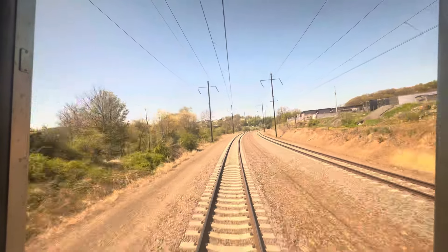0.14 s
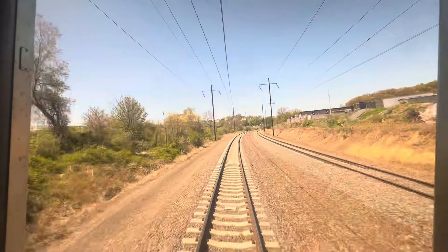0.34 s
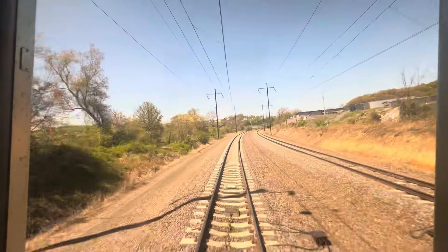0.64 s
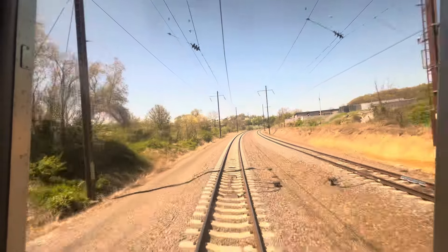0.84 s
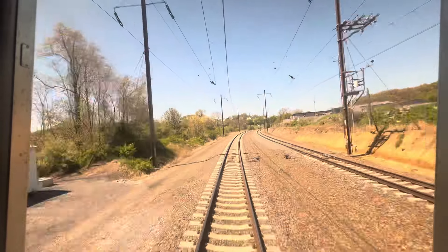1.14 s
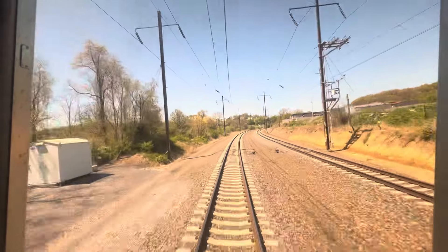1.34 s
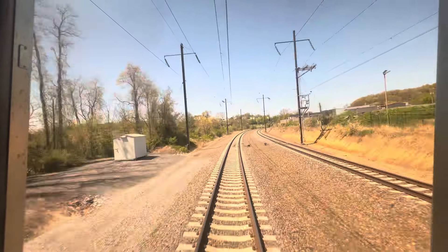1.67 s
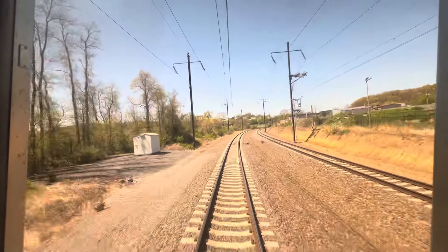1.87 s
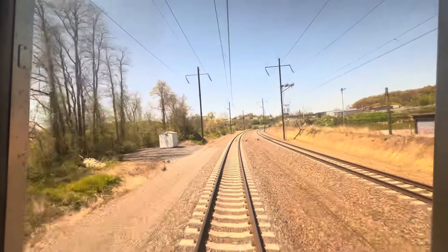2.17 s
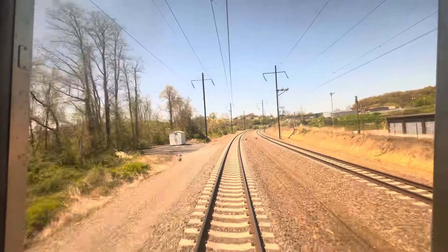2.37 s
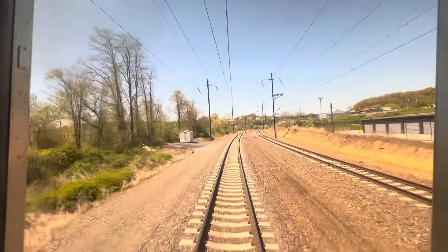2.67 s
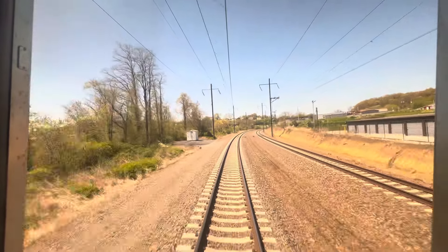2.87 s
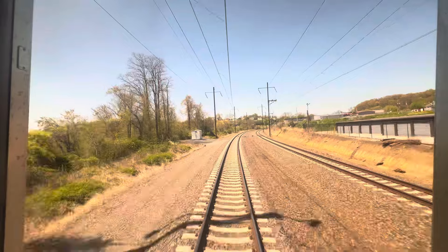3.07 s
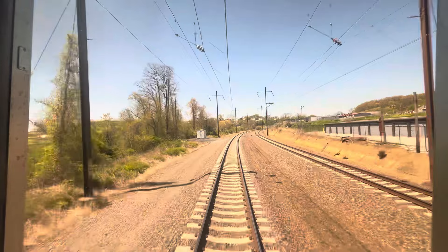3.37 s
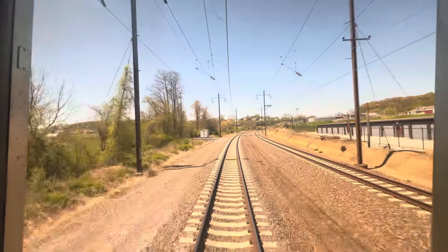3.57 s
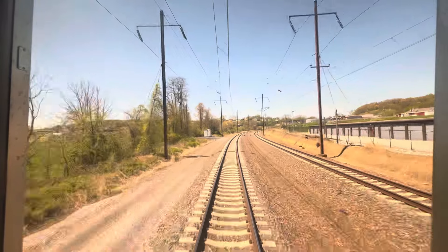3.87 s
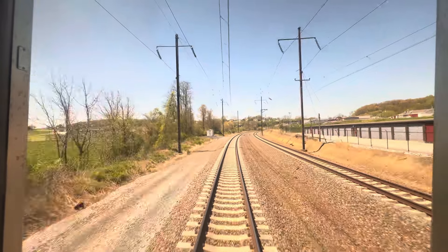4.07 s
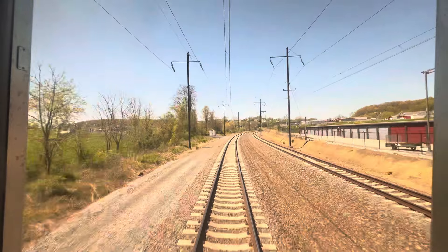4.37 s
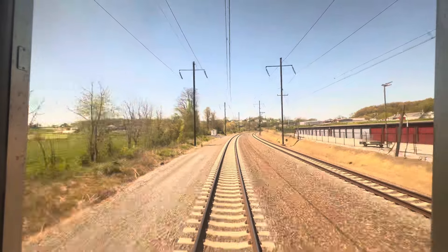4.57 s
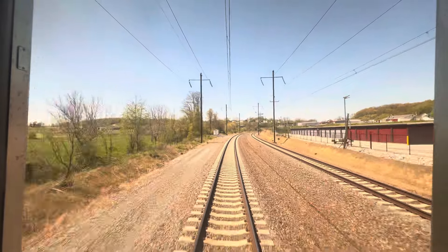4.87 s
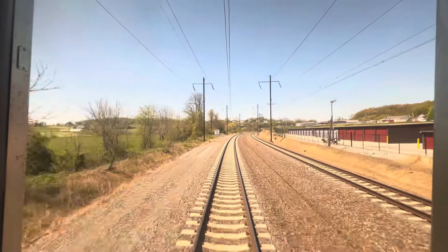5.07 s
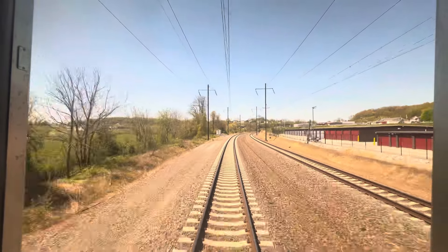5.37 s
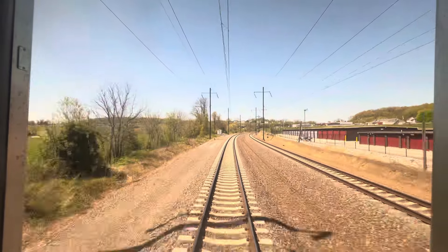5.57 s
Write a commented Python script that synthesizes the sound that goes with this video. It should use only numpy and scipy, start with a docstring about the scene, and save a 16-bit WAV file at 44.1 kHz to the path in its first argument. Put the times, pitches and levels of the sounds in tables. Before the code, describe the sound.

Heard from inside a moving train car, wheels rumble continuously on the rails, with a low motor hum and a light draught at the door. Close by and slightly left, metal fittings rattle at the start, followed by a quick cluster of hollow door knocks. The rattling then thins to occasional dry ticks, the wheels ring a little more from about halfway, and soft floor bumps come near the end.

```python
"""Wheels roll on the rails, heard inside the end vestibule of a passenger car at speed. Their roughness
makes the floor rumble, rails and wheels ring, and the car's air and panels boom at fixed pitches.
Draughts hiss at the door. An out-of-round wheel and a motor under the floor hum, and the motor buzzes
loose fittings once a turn. Nearby, mostly louder on the left, door hardware rattles, the door knocks,
the floor jolts and plastic trim ticks; one faint, high swish passes."""
import sys
import numpy as np
from scipy import signal
from scipy.fft import rfft, irfft, next_fast_len
from scipy.io import wavfile
from scipy.ndimage import uniform_filter1d, map_coordinates

SR = 44100
rng = np.random.default_rng(int(sys.argv[2]) if len(sys.argv) > 2 else 0)


def dump(signal):
    """Clip the signal to [-1, 1] and save it as 16-bit WAV at the path in sys.argv[1]."""
    limited = np.clip(np.atleast_2d(signal).T, -1, 1)
    pcm = np.round(limited * 32767).astype(np.int16)
    wavfile.write(sys.argv[1], SR, pcm)


N = 252252


def amp(db):
    """dB to gain."""
    return 10 ** (np.asarray(db) / 20)

def unit(x):
    """x at rms 1."""
    return x / np.sqrt(np.mean(x ** 2) + 1e-20)

def along(points, hz):
    """Reads (Hz, value) points on a log axis."""
    f, v = np.transpose(points)
    return np.interp(np.log(hz + 1), np.log(f + 1), v)

def curves(rows):
    """One automation curve for each column after the time."""
    s, *cols = np.transpose(rows)
    return [np.interp(np.arange(N) / SR, s, c) for c in cols]

def wobble(rate):
    """A smooth random curve, rate knots a second."""
    return map_coordinates(rng.standard_normal(int(N * rate / SR) + 4), [np.arange(N) * rate / SR])

def filtered(x, response):
    """x through a complex frequency response."""
    m = next_fast_len(x.shape[-1] + SR // 2)
    return irfft(rfft(x, m) * response(np.fft.rfftfreq(m, 1 / SR)), m)[..., :x.shape[-1]]

def modes(table, f):
    """Gain of (Hz, width, dB) resonances whose powers add."""
    return np.sqrt(sum(amp(2 * db) / (1 + ((f * f - c * c) / (f * w + 1)) ** 2) for c, w, db in table))

def band(f, hz, width):
    """Band-pass gain."""
    return modes([(hz, width, 0)], f) ** 2

def lowpass(f, hz, order):
    """High-cut gain."""
    return 1 / (1 + (f / hz) ** order)

def sides(db):
    """Left and right gains for a pan in dB; positive is left."""
    return amp(np.array([db / 2, -db / 2]))

def add(track, s, sound):
    """Mixes a short sound into the track at time s."""
    start = round(s * SR)
    track[:, start:start + sound.shape[1]] += sound

# Stereo image of the noise beds. Each row: frequency in Hz, then in turn
LIKENESS = [(30, .88), (90, .8), (215, .74), (344, .8), (460, .3), (560, .62), (730, .55), (950, .1),
            (1230, .65), (1420, .32), (1750, .12), (1900, .45), (2200, .15), (2450, .6), (2800, .64),
            (3400, .1), (4000, .25), (5500, .12), (8700, .35)]  # left-right likeness from 0 to 1,
LEFT_LEAD = [(0, 0), (340, -.4), (480, 2.8), (620, 3), (750, 2.2), (900, 2.3), (1120, 4.5), (1250, 4.2),
             (1640, 4.8), (1900, 5.4), (2400, 9.6), (3100, 8.8), (3700, 6.6), (4800, 7.2)]  # phase lead of the left in radians,
BED_PAN = [(40, 4.5), (90, 2), (140, 13), (210, -2), (400, -3), (800, 0), (1300, 5), (2500, 11.5),
           (4000, 8.5), (5500, 12.5), (7000, 10), (9000, -1)]  # pan in dB.
def noise_bed(colour, patchy_db):
    """Stereo noise, patchy in time and pitch, its mono mix at rms 1."""
    spectra = signal.stft(rng.standard_normal((2, N)), nperseg=512)[2]
    patches = uniform_filter1d(uniform_filter1d(rng.standard_normal(spectra.shape[1:]), 5, 0), 10, 1)
    pair = signal.istft(spectra * amp(patchy_db * unit(patches)), nperseg=512)[1][:, :N]
    spread = lambda f: np.arccos(np.clip(along(LIKENESS, f), 0, 1)) / 2
    mid, side = filtered(pair, lambda f: colour(f) * [np.cos(spread(f)), np.sin(spread(f))])
    shift = lambda f: np.exp(.5j * np.array([[1], [-1]]) * along(LEFT_LEAD, f))
    both = filtered(np.array([mid + side, mid - side]), lambda f: sides(along(BED_PAN, f)) * shift(f))
    return both / np.std(both.mean(axis=0))

# Rumble EQ. Each row: frequency in Hz, level in dB.
RUMBLE_EQ = [(12, -43), (20, -11.5), (70, 0), (96, 0.5), (156, -12), (190, -17.5), (250, -27.5),
             (420, -120)]
def floor_rumble(level_db):
    """Wheel and rail roughness shakes the floor."""
    gain = amp(level_db - 2 + .88 * wobble(14))
    return gain * noise_bed(lambda f: amp(along(RUMBLE_EQ, f)), patchy_db=1.04)

# Rail resonances. Each row: pitch in Hz, width in Hz, level in dB.
RAIL_MODES = [(804, 260, 0.5), (863.5, 16, 7.5), (892, 11, 10.5), (926.6, 8.3, 10), (1029, 42, 3),
              (1150, 14, -4.5), (1259, 25, 1.5), (1301, 23, 4.5), (1366, 22, 1), (1390, 16, 5.5),
              (1506, 73, -6), (1640, 120, -9.5), (2000, 1600, -13.5), (2718, 130, -7)]
def rail_roar(level_db):
    """The rails resonate under the rolling wheels."""
    colour = lambda f: modes(RAIL_MODES, f) * band(f, 1400, 2200) * lowpass(f, 3300, 8)
    return amp(level_db) * noise_bed(colour, patchy_db=1.5)

# Wheel web and rim resonances. Each row: pitch in Hz, width in Hz, level in dB.
WEB_MODES = [(1478, 34, 8), (1575, 30, 3), (1684, 30, 3), (1860, 40, -1), (1950, 40, -1), (2009, 14, 3.5),
             (2070, 20, 2.5), (2145, 24, -1), (1900, 500, -10)]
RIM_MODES = [(2276, 78, 0.5), (2370, 360, -15.5), (2380, 14, 0), (2520, 16, -4)]
# Ring faders. Each row: time in seconds, web gain in dB, rim gain in dB.
RING_FADERS = [(0, -10, -19), (.75, -18, -22), (2.2, -31, -12.5), (2.5, -11.5, -3.5), (2.9, -4.5, -3),
               (3.4, -3, -2), (3.9, -2, -4), (5.72, -4, -1.5)]
def wheel_ring(level_db):
    """Rolling sets the web and rim of the wheels ringing."""
    web_db, rim_db = level_db + curves(RING_FADERS)
    web = noise_bed(lambda f: modes(WEB_MODES, f) * band(f, 1850, 1400), patchy_db=0)
    rim = noise_bed(lambda f: modes(RIM_MODES, f) * band(f, 2350, 700), patchy_db=.5)
    return amp(web_db) * web + amp(rim_db - 9) * rim

# Air and panel resonances. Each row: pitch in Hz, width in Hz, level in dB.
CAR_MODES = [(180, 12, -9), (203, 8, -5), (268, 10, -11), (330, 12, -9), (365, 6, -11), (385, 6, -5),
             (405, 10, -12), (449, 10, -9), (508, 8, -16), (530, 10, -17), (560, 8, -13.5), (650, 90, -28)]
# Tones in the boom. Each row: cycles per wheel turn, gain in dB.
BOOM_TONES = [(34.1, -4), (39.8, -8), (46.4, -13)]
def car_boom(level_db, rough, wheel):
    """Air and panels boom at fixed pitches, with tones that follow the wheel and swell with its rim."""
    tone_db = level_db + .3 * curves(RING_FADERS)[1]
    tones = sum(amp(tone_db + db + wobble(3.5)) * np.cos(2 * np.pi * k * wheel + .5 * wobble(4.5))
                for k, db in BOOM_TONES)
    walls = lambda f: (modes(CAR_MODES, f) + amp(-24) * band(f, 330, 300)) * lowpass(f, 1100, 4)
    return tones + amp(level_db + .4 * rough) * noise_bed(walls, patchy_db=.5)

# Draught EQ. Each row: frequency in Hz, level in dB.
DRAUGHT_EQ = [(2200, -26), (3000, -2.5), (3600, -4.5), (4600, -9.5), (5500, -9), (6500, -15), (7500, -19.5),
              (8700, -20), (9600, -39.5), (12000, -34), (16000, -82.5)]
def draught(level_db):
    """Air hisses at the door."""
    return amp(level_db) * noise_bed(lambda f: amp(along(DRAUGHT_EQ, f)), patchy_db=1.5)

def loose_fitting(level_db):
    """A shaken fitting sings near two pitches."""
    song = noise_bed(lambda f: modes([(5550, 330, 0), (3470, 160, 1.5)], f) ** 2, patchy_db=2.4)
    return amp(level_db + 3.3 * wobble(2.27)) * song

# Rolling faders. Each row: time in seconds, rumble in dB, roar in dB.
ROLL_FADERS = [(0.0, -27, -24), (0.08, -16.5, -35), (0.2, -22, -30), (0.41, -20.5, -32.5),
               (0.57, -21, -30.5), (1.05, -19, -32), (1.38, -17.5, -32.5), (1.5, -19.5, -32.5),
               (1.69, -26.5, -34.5), (1.88, -23.5, -36), (2.1, -26.5, -37.5), (2.22, -20, -33),
               (2.35, -21, -35.5), (2.48, -20.5, -32), (2.75, -24, -31.5), (3.17, -20, -32),
               (3.43, -16, -30.5), (3.63, -23, -35.5), (3.92, -23, -32.5), (4.13, -23, -36.5),
               (4.75, -23, -34.5), (5.55, -18, -31.5), (5.72, -15.5, -32.5)]
# Slow trims. Each row: time in seconds, boom gain in dB, hiss gain in dB.
DRIFT_FADERS = [(0, -4.5, 4), (.45, -2, -1.5), (1.2, 0.5, -1), (1.8, -3, -2.5), (2.5, 0.5, 0),
                (3.4, 0.5, 2), (4.5, 1, 2), (5.72, 0, 3)]
def rolling(wheel, motor):
    """The running bed: boom and hiss ride the roar, and rougher rail lifts the roar, the ring, the boom's noise
    and the draught."""
    rumble_db, roar_db = curves(ROLL_FADERS)
    swell_db = roar_db - roar_db.mean()
    boom_db, hiss_db = np.array([-29.5 + 1.17 * swell_db, -55.5 + 1.04 * swell_db]) + curves(DRIFT_FADERS)
    rough = wobble(7.5)
    buzz = np.cos(np.pi * (motor + .25)) ** 6  # one short shake each motor turn
    return (floor_rumble(rumble_db)
            + rail_roar(roar_db + .27 * rough + .55 * buzz)
            + wheel_ring(roar_db + 1.3 * rough)
            + car_boom(boom_db, rough, wheel)
            + draught(hiss_db + .9 * rough + 2.6 * buzz)
            + loose_fitting(hiss_db - 8.5 + 4.8 * buzz))

# Hum faders. Each row: time in seconds, then level in dB of three wheel and four motor harmonics.
HUM_FADERS = [(0.0, -25, -19.5, -49, -38, -41, -20, -39), (0.24, -31, -31, -40, -44, -25.5, -42, -49),
              (0.94, -42, -22.5, -36.5, -43, -29.5, -38, -32.5),
              (1.74, -25.5, -40, -42, -38.5, -44, -44, -32), (2.05, -25, -35.5, -29, -33, -48, -39, -53),
              (2.58, -25, -21.5, -45, -27, -25, -28, -35.5), (3.09, -23, -37, -43, -24.5, -19.5, -40, -34),
              (3.44, -41, -26, -34, -31, -18, -29, -27), (4.01, -33.5, -35.5, -30, -23.5, -20, -37, -39.5),
              (4.49, -24, -21.5, -41, -43, -47, -30, -51), (4.62, -22.5, -24, -45, -37, -28.5, -40, -46),
              (5.451, -33, -33, -31.5, -23.5, -24, -21, -34), (5.72, -31, -28, -48, -34, -26, -32, -55)]
def hums(wheel, motor):
    """The out-of-round wheel and the motor hum at multiples of their turns, wavering a little."""
    cycles = [k * wheel for k in (4, 8, 10)] + [k * motor for k in (1, 2, 3, 7)]
    hum = sum(amp(db) * np.cos(2 * np.pi * c + .18 * wobble(1.5))
              for c, db in zip(cycles, curves(HUM_FADERS)))
    return hum * sides(3.8)[:, None]

# Rattle colour. Each row: frequency in Hz, level or pan in dB.
METAL_EQ = [(1500, 0), (3000, -5), (4200, -10), (5700, 2), (6500, -3.5), (7800, -7.5), (8900, -11),
            (10000, -33.5), (12000, -15), (13500, -52), (15000, -20.5)]
CRACK_EQ = [(1200, -26), (3000, -8), (5500, 8.5), (10500, -5), (12500, -6), (16000, -30)]
RATTLE_PAN = [(1000, 0), (5000, 11), (7500, 7.5), (8800, 0.5), (16000, 4.5)]
# Rattles. Each row: start in seconds, level in dB, dull part in dB, seconds for the fizz to fall 60 dB.
RATTLES = [(0.0192, -22.5, -27, 0.15), (0.0353, -27.5, -28, 0.17), (0.193, -40.5, -4, 0.18),
           (0.255, -45.5, -5, 0.37), (0.4574, -38, -5, 0.18), (0.475, -28.5, 6, 0.12),
           (0.4913, -23.5, -3, 0.2), (0.5047, -26, -34, 0.17), (0.5701, -40.5, 14.5, 0.23),
           (0.6327, -40, -15, 0.18), (0.6584, -41, 4, 0.08), (0.6802, -35.5, 5.5, 0.19),
           (0.7078, -39, 4, 0.068), (0.7357, -40, 5, 0.19), (0.7747, -39.5, 13, .07),
           (1.236, -45, 13, 0.12), (1.4666, -51, -9, 0.22), (2.5009, -51.5, -21, 0.17),
           (3.134, -48, -7, 0.15)]
def door_hardware():
    """A sharp crack, then a fizz: bright in the metal, dull and shorter in the door leaf."""
    track, t = np.zeros((2, N + SR)), np.arange(SR // 4) / SR
    loudest_db = max(row[1] for row in RATTLES)
    apart = lambda f: .956 * lowpass(f, 10500, 10)  # the very top is common to both sides
    for s, db, dull_db, t60 in RATTLES:
        noise = rng.standard_normal((3, len(t)))
        common, *own = filtered(noise, lambda f: np.array([np.sqrt(1 - apart(f) ** 2), *[apart(f)] * 2]))
        pair = filtered(common + np.array(own), lambda f: sides(along(RATTLE_PAN, f)))
        bright = unit(filtered(pair, lambda f: amp(along(METAL_EQ, f))))
        dull = unit(filtered(pair, lambda f: band(f, 1900, 1300) * lowpass(f, 4000, 4)))
        sharp = unit(filtered(pair, lambda f: amp(along(CRACK_EQ, f))))
        fizz = (1 - np.exp(-t / .0016)) * bright + amp(dull_db - 60 * t / .52) * dull
        crack_db = 1.5 - .12 * (loudest_db - db)  # fainter rattles crack less
        crack = amp(crack_db - 60 * t / .012) * (1 - np.exp(-t / .0004)) * sharp
        add(track, s, amp(db) * (amp(-60 * t / t60) * fizz + crack))
    return track[:, :N]

# Knocks. Each row: start in seconds, level in dB, pitch in Hz, width in Hz, cycles to fall 60 dB.
DOOR_KNOCKS = [(.209, -30.5, 1300, 400, 97), (.474, -13.5, 1750, 500, 42), (.574, -25, 840, 500, 99),
               (.656, -21, 1360, 500, 45), (0.673, -13.5, 1480, 900, 82), (.675, -15.5, 773, 400, 42),
               (.689, -14.5, 1320, 600, 97), (.709, -15.5, 900, 700, 100), (.718, -14.5, 826, 790, 95),
               (.735, -21, 1090, 900, 68), (1.055, -21, 900, 200, 110), (1.066, -18, 904, 200, 110),
               (1.084, -15.5, 923, 200, 135), (2.2003, -19.5, 1880, 500, 31), (2.2022, -13, 910, 200, 15.5)]
def door_knocks():
    """The door leaf rings briefly and hollowly; the fewer the cycles, the clearer the pitch."""
    track, t = np.zeros((2, N + SR)), np.arange(SR // 4) / SR
    for s, db, hz, width_hz, cycles in DOOR_KNOCKS:
        noise = rng.standard_normal((2, len(t)))
        ring = unit(filtered(noise, lambda f: band(f, hz, width_hz) * lowpass(f, 3000, 4)))
        tone = np.sqrt(2) * np.sin(2 * np.pi * hz * t)
        clear = min(1, 14 / cycles)
        life = t * hz / cycles
        envelope = amp(db - 60 * life) * (1 - np.exp(-25 * life))
        add(track, s, envelope * (clear * tone + (1 - clear) * ring) * sides(2.8)[:, None])
    return track[:, :N]

# Jolts. Each row: start in seconds, push in dB, pitch in Hz, pan in dB.
FLOOR_JOLTS = [(0.37, 24, 85, 4), (0.401, 24, 68, 2), (0.766, 24.5, 141, 9), (0.975, 26.5, 79.4, 6),
               (1.494, 10, 105, 40), (2.357, 20, 77, 6), (4.147, 23, 63, 3.5), (4.323, 23, 63, 5),
               (4.552, 21, 63, 6), (4.761, 21.5, 62, 7.5), (4.966, 24, 70.6, 4), (5.062, 19, 78, 10),
               (5.167, 23, 72.5, 6)]
def floor_jolts(rise_cycles=2.08, decay_cycles=3.24):
    """A soft push makes the floor swing for about two cycles."""
    track, t = np.zeros((2, N + SR)), np.arange(SR // 8) / SR
    for s, db, hz, pan_db in FLOOR_JOLTS:
        envelope = amp(db - 60 * t * hz / decay_cycles) * (1 - np.exp(-t * hz / rise_cycles)) ** 2
        add(track, s, -envelope * np.sin(2 * np.pi * hz * t) * sides(pan_db)[:, None])
    return track[:, :N]

# Ticks. Each row: start in seconds, level in dB, pan in dB, pitch in Hz.
TRIM_TICKS = [(0.4477, -48, 0, 4000), (0.689, -40, 4, 5800), (0.7102, -48, 5, 5500), (0.745, -33, 8, 3330),
              (0.749, -46, 0, 6500), (0.763, -42, -4, 3500), (0.778, -36, 7, 3000), (1.228, -35.5, 2, 2740),
              (1.234, -44, 0, 6300), (1.2677, -40.5, 11, 5200), (2.066, -54, 9, 4000),
              (2.179, -43.5, -15, 4100), (2.245, -52, 9, 4000), (2.2675, -54, 8, 5900),
              (2.676, -46, -3, 5200), (3.0545, -55, 3, 5400), (3.0724, -33, -3, 5200),
              (3.088, -46, 10, 5600), (4.622, -49, 4, 3500)]
def trim_ticks(rise_cycles=.9, edge_hz=3500, edge_db=-13):
    """Plastic trim ticks dryly: a cycle or two of pitch under a bright edge three times as long."""
    track, t = np.zeros((2, N + SR)), np.arange(256) / SR
    bright = lambda f: lowpass(f, 9500, 8) / (1 + (edge_hz / (f + 1)) ** 4)
    for s, db, pan_db, hz in TRIM_TICKS:
        noise, phase = rng.standard_normal((2, 1024)), rng.uniform(0, np.pi, (2, 1))
        life = t * hz / rise_cycles
        tone = np.exp(-life) * np.sqrt(2) * np.sin(2 * np.pi * hz * t + phase)
        edge = amp(edge_db) * np.exp(-life / 3) / 3 * unit(filtered(noise, bright))[:, -len(t):]
        add(track, s, amp(db + 8) * np.e * life * (tone + edge) * sides(pan_db)[:, None])
    return track[:, :N]

def swish(peak_s=3.99, fade_s=.06, level_db=-61):
    """A brief puff of high hiss."""
    track, t = np.zeros((2, N)), np.arange(SR // 2) / SR - .25
    noise = rng.standard_normal((2, len(t)))
    puff = unit(filtered(noise, lambda f: band(f, 8200, 4000) * lowpass(f, 9800, 16)))
    add(track, peak_s + t[0], amp(level_db) * np.exp(-(t / fade_s) ** 2) * puff)
    return track

# Running speed. Each row: time in seconds, wheel and motor speeds in turns per second.
TURN_RATES = [(0, 9.63, 28.7), (1.2, 9.63, 28.85), (2.1, 9.63, 29.05), (3, 9.63, 28.95), (3.6, 9.62, 29.15),
              (4.2, 9.73, 29.8), (4.8, 9.77, 29.45), (5.72, 9.77, 29.45)]
def scene():
    """All sources at the microphones."""
    wheel, motor = np.cumsum(curves(TURN_RATES), axis=1) / SR - [[.206], [.7]]  # angles in turns
    bed = rolling(wheel, motor) + hums(wheel, motor)
    return bed + door_hardware() + door_knocks() + floor_jolts() + trim_ticks() + swish()

def record(dry, low_hz=24, top_hz=15800):
    """Cuts the deepest bass and everything above top_hz."""
    edge = SR // 10  # mirrored, fading ends keep the filter from clicking
    fade = signal.windows.tukey(N + 2 * edge, 2 * edge / (N + 2 * edge))
    padded = np.pad(dry, ((0, 0), (edge, edge)), "reflect") * fade
    passband = lambda f: np.clip((top_hz - f) / 500, 0, 1) / np.sqrt(1 + (low_hz / (f + 1)) ** 12)
    return filtered(padded, passband)[:, edge:-edge]


dry = scene()
out = record(dry)
dump(out)
```